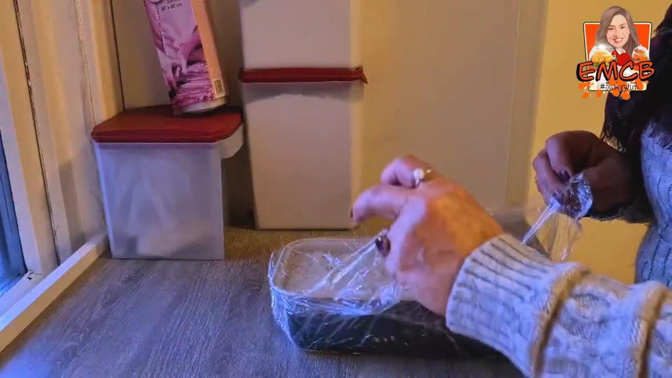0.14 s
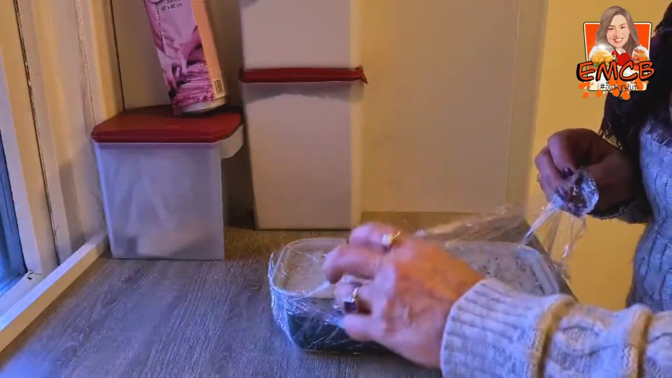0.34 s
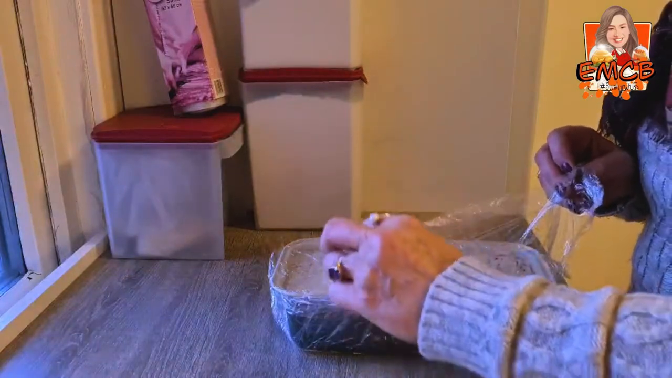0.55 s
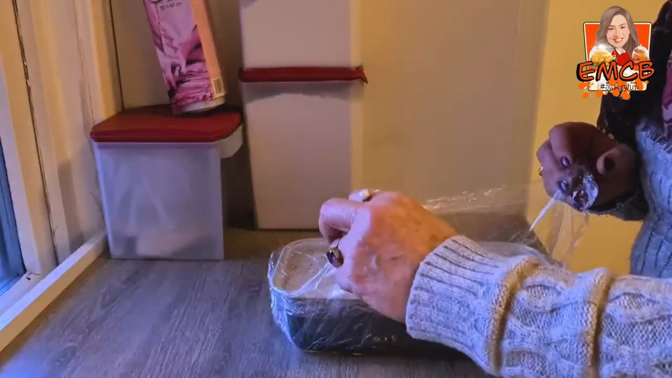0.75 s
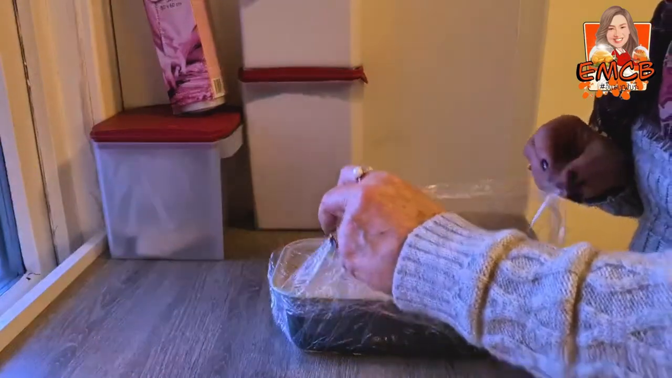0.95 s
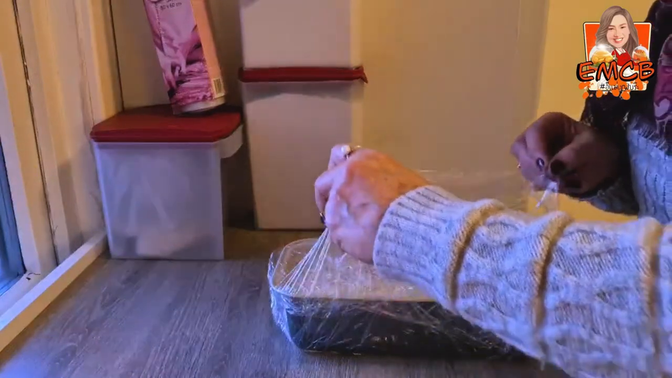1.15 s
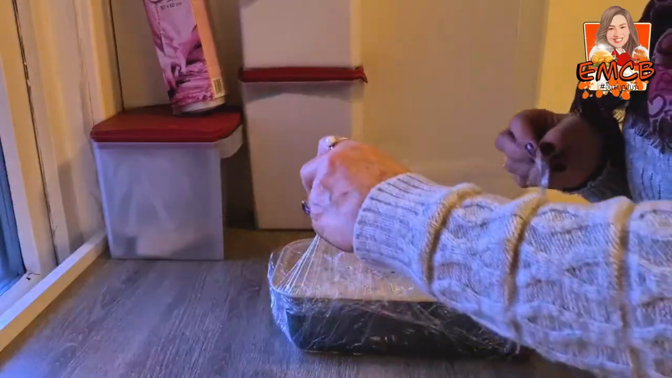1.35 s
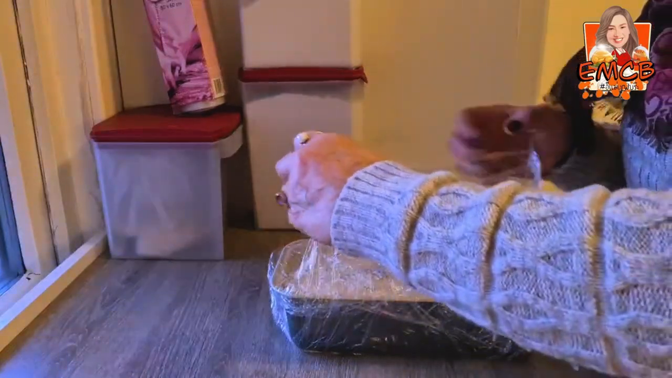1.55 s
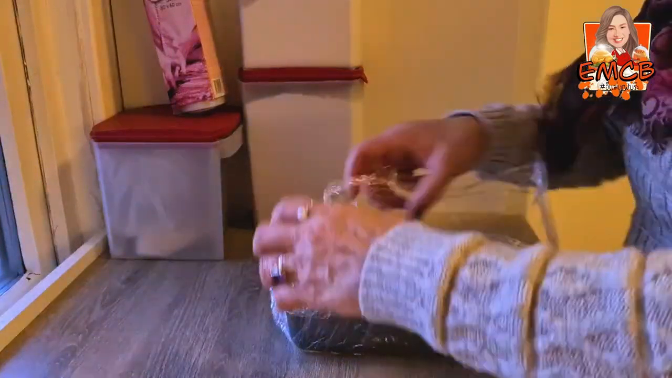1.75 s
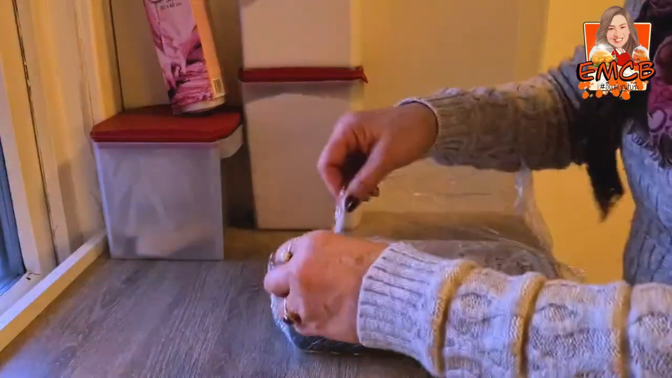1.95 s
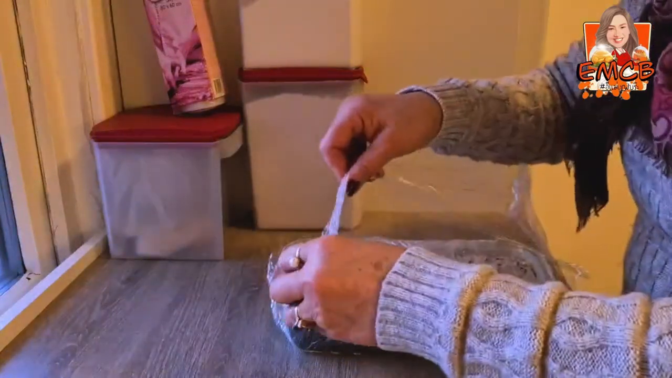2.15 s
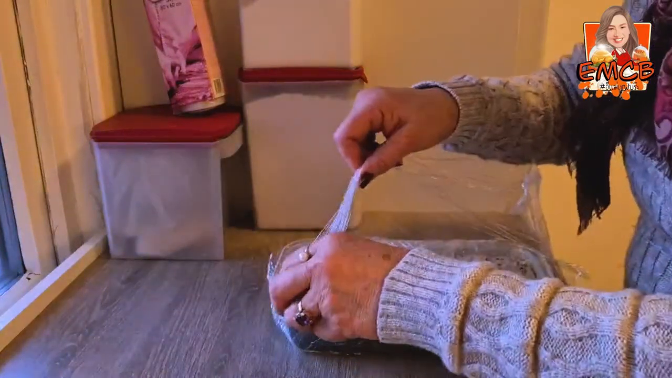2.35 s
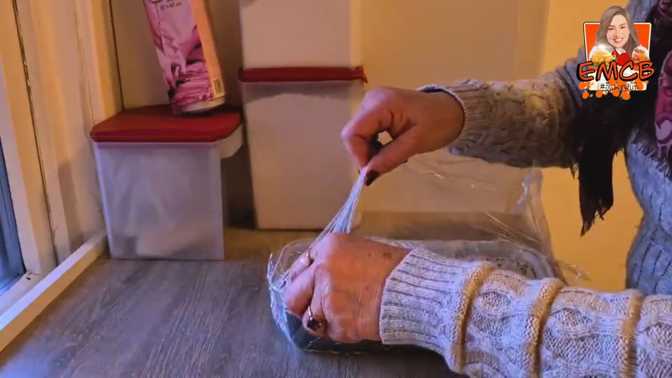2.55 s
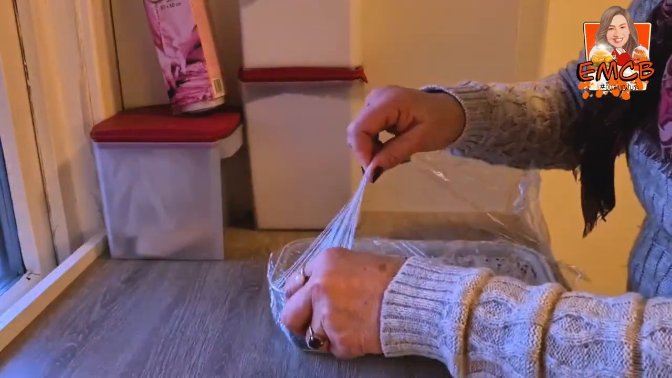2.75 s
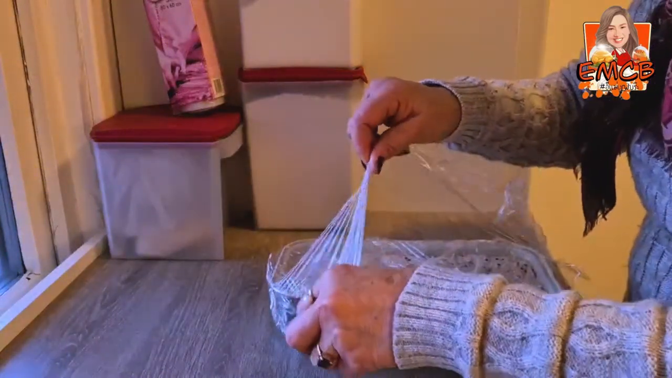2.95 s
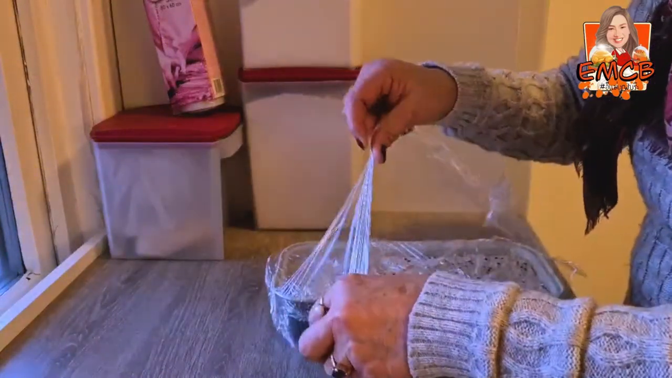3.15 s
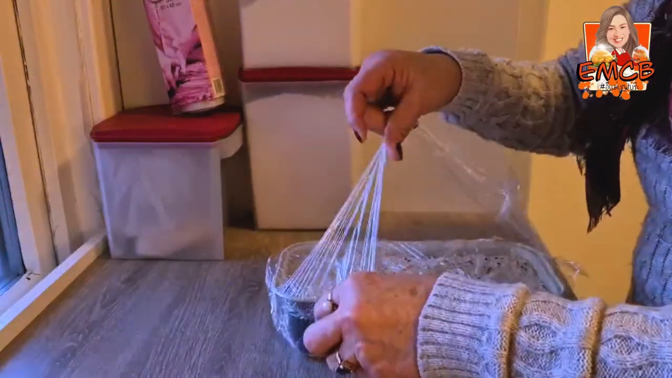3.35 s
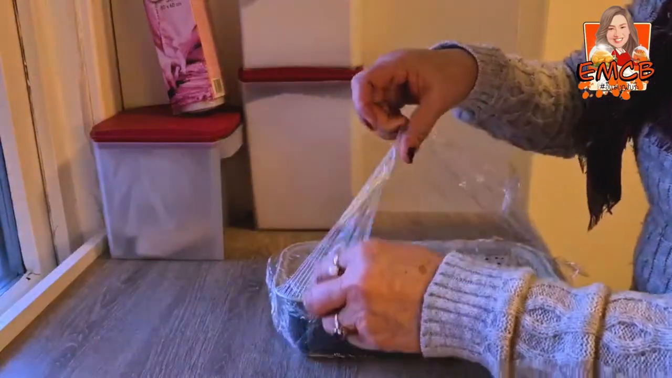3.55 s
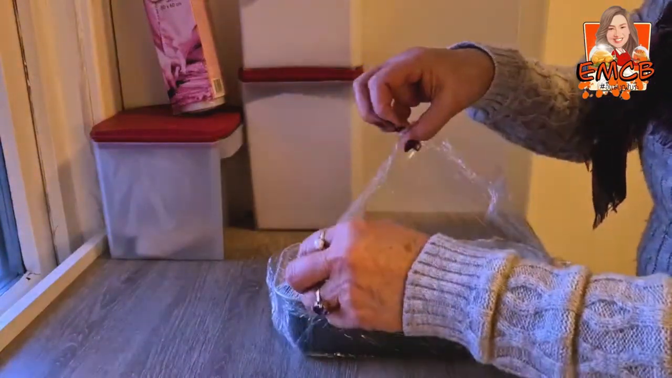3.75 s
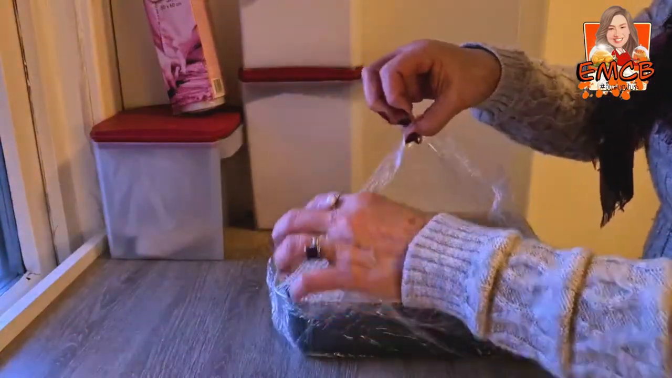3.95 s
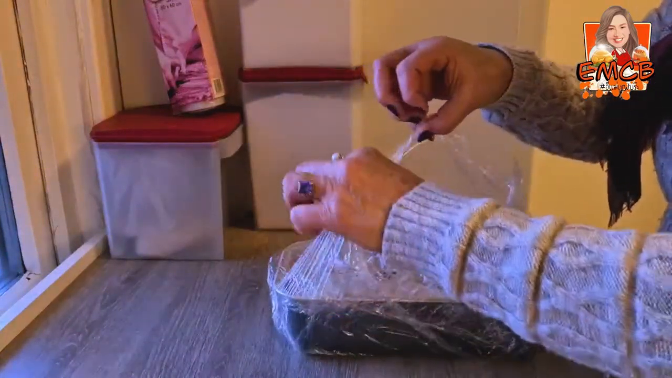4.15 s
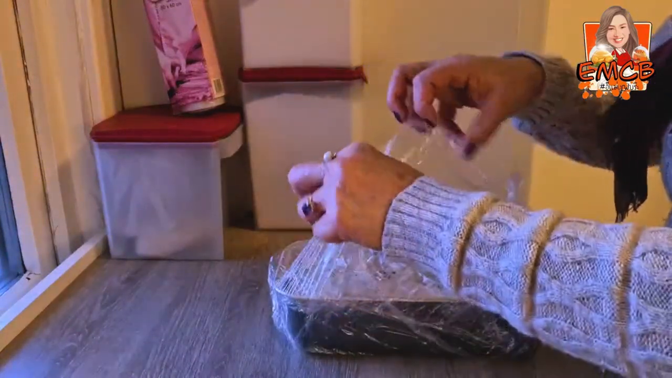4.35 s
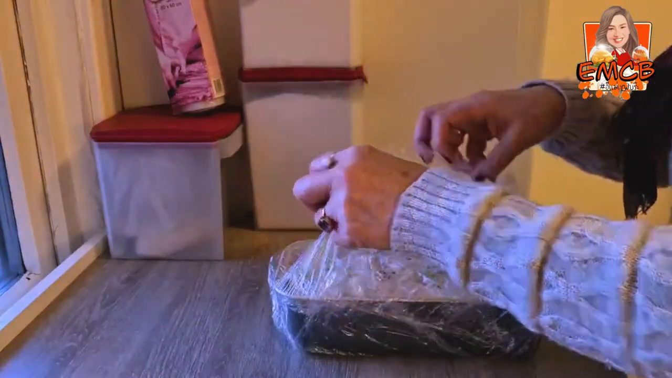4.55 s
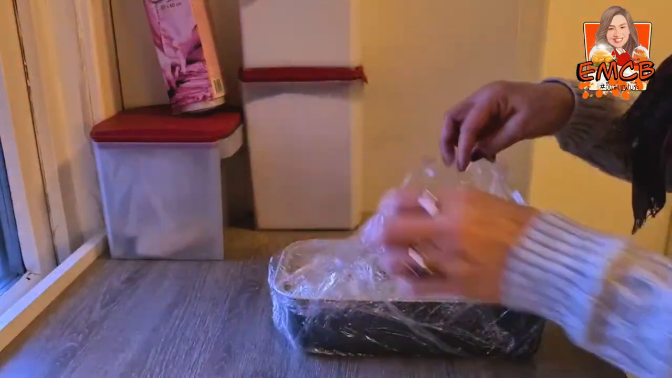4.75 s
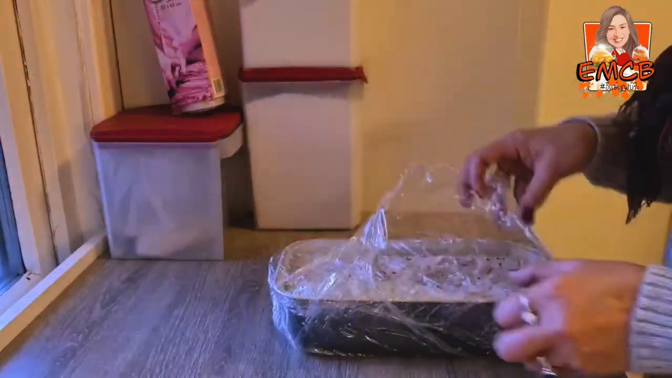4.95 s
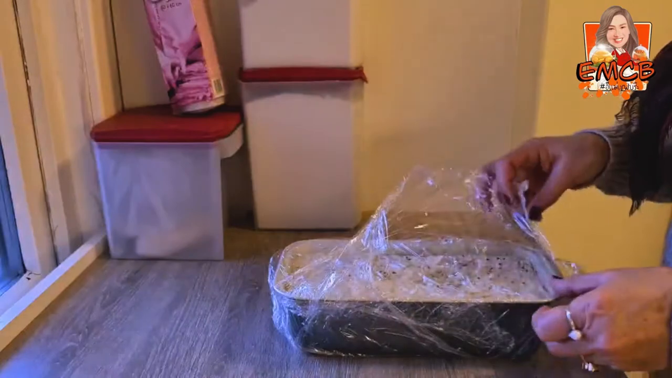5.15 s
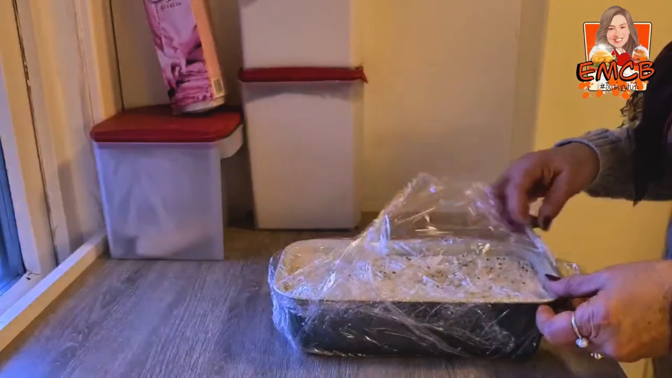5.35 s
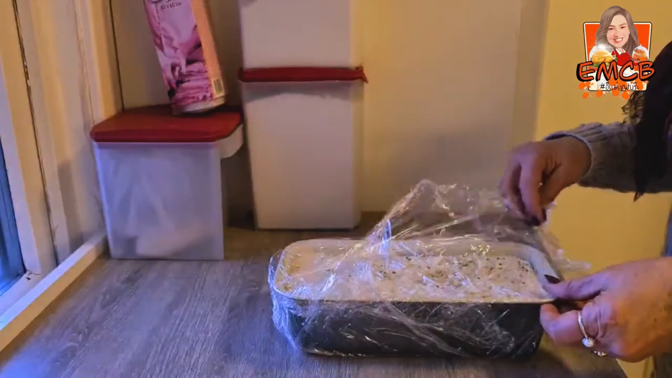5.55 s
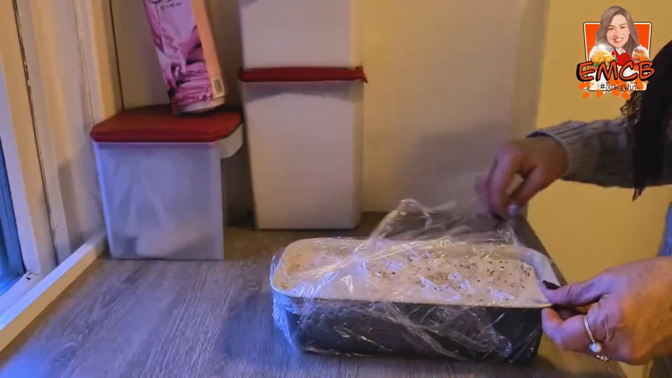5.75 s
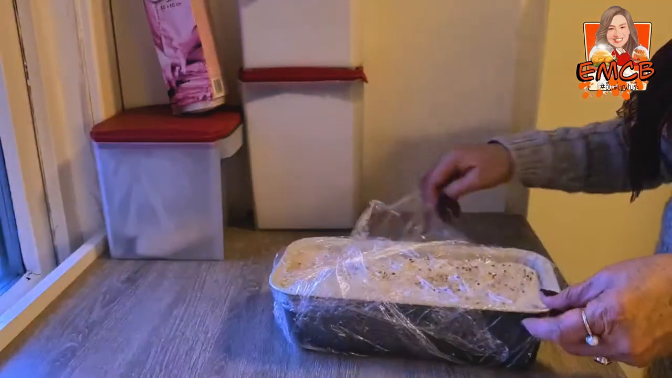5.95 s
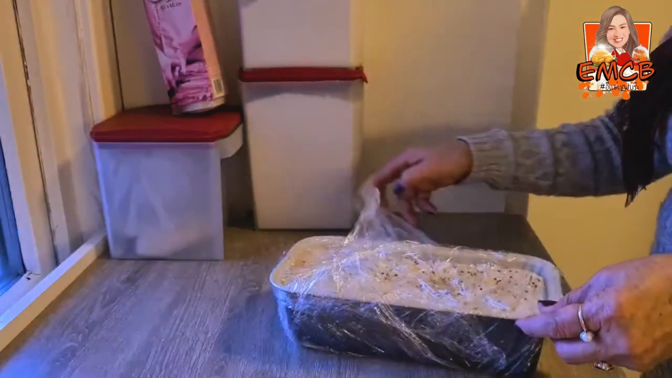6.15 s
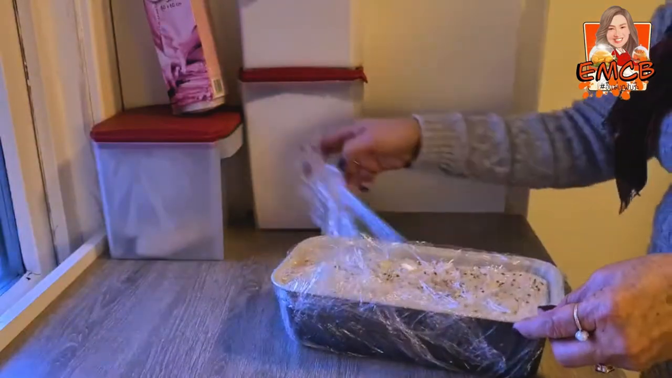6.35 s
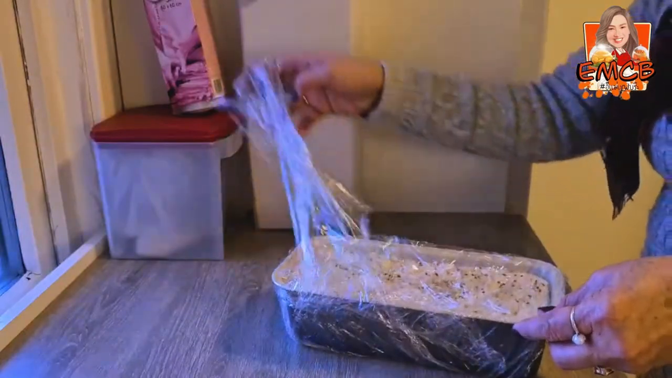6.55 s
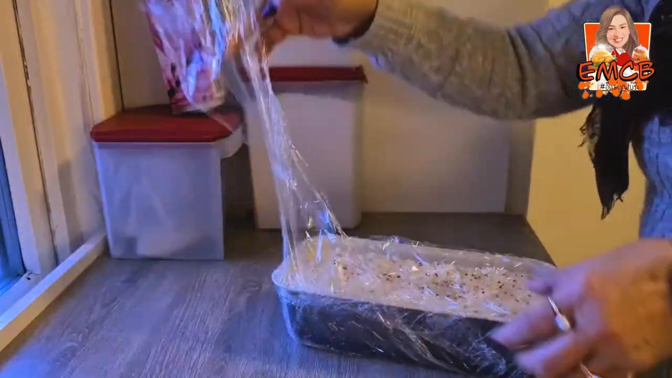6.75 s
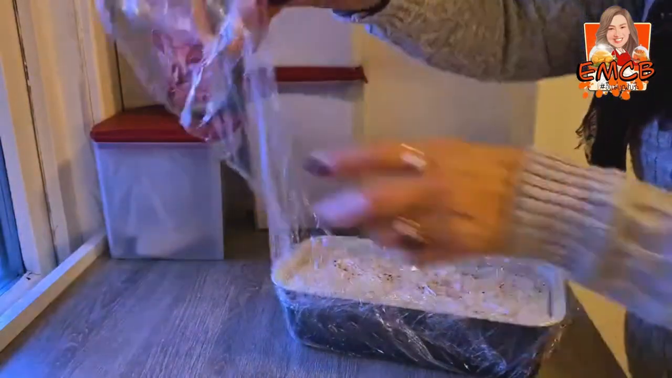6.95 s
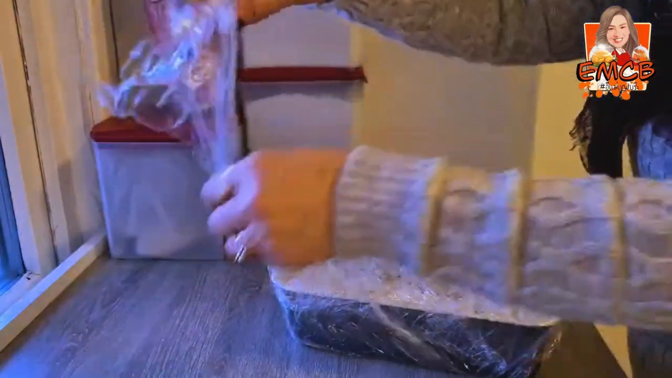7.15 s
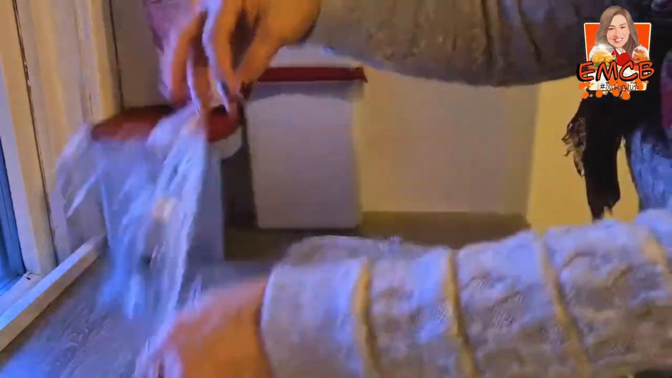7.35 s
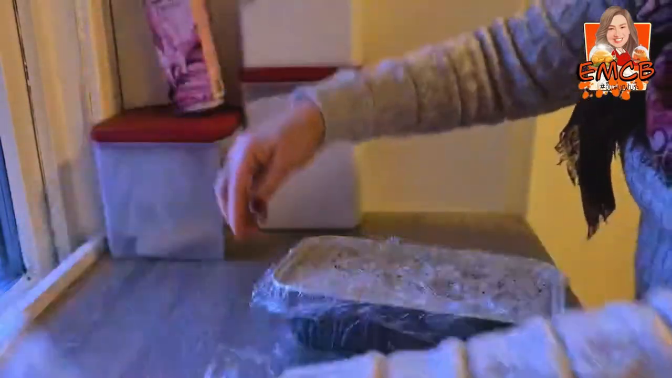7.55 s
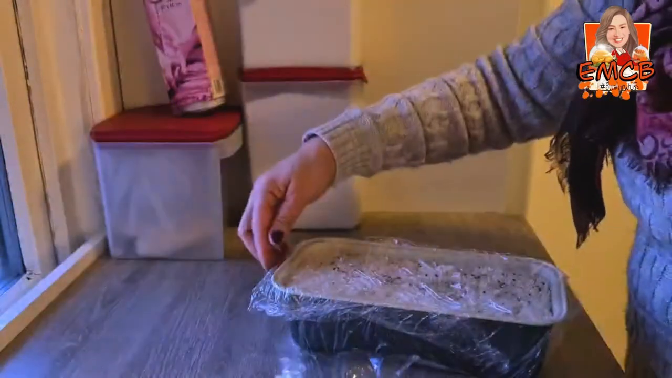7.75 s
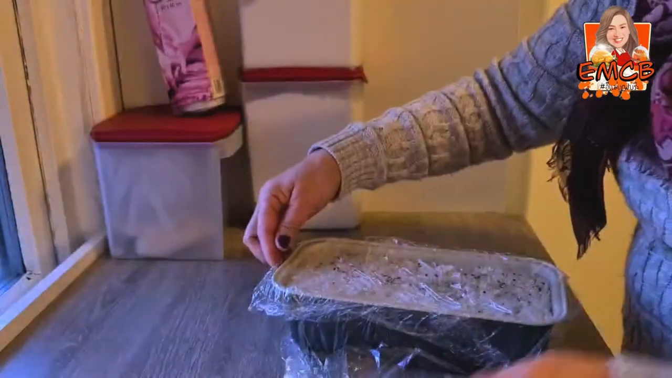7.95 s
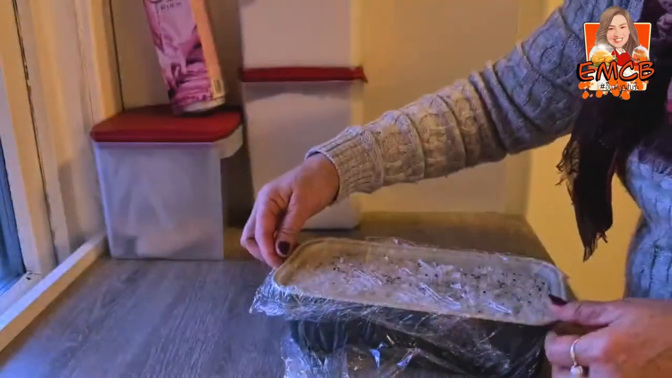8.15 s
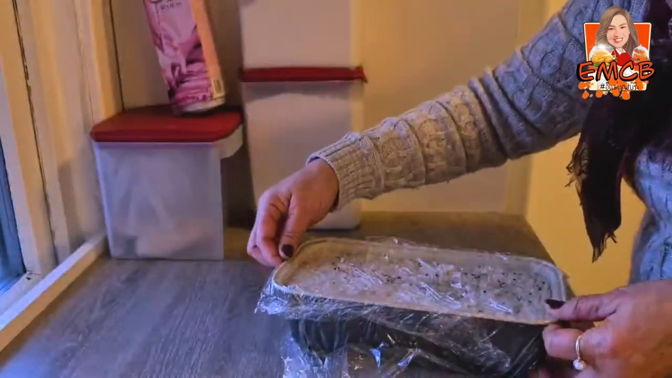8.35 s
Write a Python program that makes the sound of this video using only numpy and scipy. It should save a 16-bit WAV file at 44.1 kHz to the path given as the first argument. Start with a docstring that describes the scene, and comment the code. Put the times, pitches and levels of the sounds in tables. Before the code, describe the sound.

A close stereo pair hears thin plastic film being peeled from a pan in a small, hard, quickly damped kitchen. A burst of bright crinkling opens at 0 s, followed by light crackles and small snaps to 1.5 s, with soft low knocks near 0.5, 0.9 and 1.3. After a short lull, tugs and crisp pops thicken from 1.8 to 3.1, with a firmer pan knock at 3.05. A tiny faint squeak comes near 3.3. Sparse crackle leads to a sharp snap and knock at 4.15, a brief rustle at 4.6, then near quiet around 5. From 5.8 the crinkling grows fuller and louder, peaking around 6.6 to 7.6 with knocks near 6.8 and duller, heavier snaps. It thins to faint fingering after 7.8, with a small knock at 8.4. A weak, steady low hum and soft room air continue throughout.

```python
"""A burst of crinkling is heard first, over a low hum: thin plastic film is peeled off a baking pan on a worktop.
Creases buckle as short damped tones in clumps; stuck patches let go as bursts of coloured noise with a brief ring.
Random slips ring a taut strip in one squeak, and knocks ring decaying modes of the pan and worktop.
An appliance hums at twice the mains rate as two sines, over filtered room noise; sparse echoes form a small hard
room, heard by a close pair of microphones."""
import sys
import numpy as np
from scipy import signal
from scipy.fft import rfft, irfft, next_fast_len
from scipy.io import wavfile
from scipy.ndimage import uniform_filter1d

SR = 44100
rng = np.random.default_rng(int(sys.argv[2]) if len(sys.argv) > 2 else 0)


def wav_record(signal):
    """Record a signal, one row per channel, as 16-bit PCM in the file named by sys.argv[1]."""
    frames = np.transpose(np.atleast_2d(signal))
    bounded = np.clip(frames, -1, 1)
    # unit amplitude maps onto the largest positive 16-bit level
    quanta = np.round(bounded * 32767).astype(np.int16)
    wavfile.write(sys.argv[1], SR, quanta)


N = 374850  # samples

# All source levels are relative, before the final mix.
# Spectrum of the room air: frequency_hz, gain_db
AIR_SPECTRUM = [(30, 1), (80, 11.5), (200, -3.5), (320, -5.5), (600, 1.5), (800, -25), (1500, -7),
                (5000, -27)]
# Course of the appliance hum: time_s, level_db
HUM_LEVEL = [(0.0, -50), (6.77, -48), (8.5, -50)]
# Reverberation time of the room by band: frequency_hz, t60_s
ROOM_DECAY = [(150, 0.18), (600, 0.17), (2500, 0.1), (7000, 0.22), (14000, 0.054)]
# Modes of pan and worktop: frequency_hz, level_db, t60_s
PAN_MODES = [(160, -11, 0.097), (213, -6.5, 0.057), (310, -6, 0.071), (417, -1, 0.042), (535, -2, 0.061),
             (626, -1.5, 0.054), (1004, -4.5, 0.082), (1570, 5, 0.06)]
# Pan rocking on the worktop: start_s, level_db, favoured_pitch_hz
KNOCKS = [(0.509, -32.5, 654), (0.943, -31.5, 166), (1.308, -34, 415), (2.545, -40, 610), (3.026, -31, 651),
          (3.056, -22.5, 210), (4.023, -37, 417), (4.15, -24.5, 230), (4.961, -44, 423),
          (5.093, -46.5, 592), (5.423, -34, 617), (5.614, -36, 460), (6.797, -28, 285), (6.827, -21, 305),
          (6.989, -32.5, 184), (8.308, -42, 536), (8.379, -34, 160)]
# Taut film slipping under a finger: start_s, length_s, level_db, pitch_hz, bandwidth_hz
SQUEAK = (3.268, .1, -45, 1600, 300)
# Stuck patches letting go: start_s, level_db, ring_hz, following_crackle_db
SNAPS = [(0.2385, -35.5, 1660, -39.5), (0.352, -46, 3450, -37.5), (0.4603, -32, 7200, -56),
         (0.5136, -35, 1660, -37), (0.594, -25.5, 7440, -29), (0.858, -33, 3200, -36),
         (0.9435, -29, 2980, -29.5), (1.2496, -38, 3460, -27), (1.309, -33, 865, -47),
         (1.406, -40, 4700, -34), (1.447, -38, 6000, -52), (1.9246, -30, 6000, -38.5),
         (1.9566, -34, 4800, -30.5), (2.071, -29.5, 7740, -36.5), (2.1624, -23, 6040, -37),
         (2.326, -26, 5120, -37), (2.4585, -25, 2950, -32.5), (2.541, -41, 6000, -32.5),
         (2.5495, -18, 2160, -27.5), (2.731, -31.5, 5460, -52), (2.7632, -26.5, 2650, -30.5),
         (2.8159, -24, 2720, -24), (2.8962, -25.5, 1860, -44), (3.028, -30, 2500, -25.5),
         (3.0615, -25, 2930, -19.5), (3.429, -39, 5200, -52), (3.5405, -35, 7200, -37.5),
         (3.761, -41, 3300, -38.5), (3.8, -38, 1390, -27), (3.8058, -25, 3170, -34),
         (3.8748, -30.5, 12400, -41), (4.15, -15, 6800, -27), (4.307, -31.5, 6140, -40),
         (4.557, -31, 2830, -23), (5.847, -32, 4450, -22.5), (5.887, -24.5, 2440, -23.5),
         (6.226, -24, 2970, -44), (6.6604, -31, 2950, -27), (6.879, -20.5, 1300, -22),
         (6.9156, -21.5, 1480, -24.5), (7.1126, -34.5, 3060, -31), (7.213, -36, 3220, -21),
         (7.332, -22, 1510, -20), (7.4837, -20, 1076, -23), (7.6057, -31, 3100, -26.5)]
# Light fingering between tugs: time_s, crinkle_level_db, slack_fold_level_db
FINGERING = [(0, -51, -2), (.3, -51, -7.5), (.5, -42.5, 1.5), (.8, -48, -7), (1.15, -40, -2.5),
             (1.61, -51.5, -8), (1.74, -64, 0.5), (1.9, -40.5, -0.5), (2.3, -42.5, -4), (2.7, -45.5, -6),
             (3.45, -44.5, -6.5), (3.95, -50.5, -4), (4.45, -46, -2.5), (4.8, -54.5, -7.5),
             (5.15, -59.5, -3.5), (5.45, -46, -5), (6.0, -33, -6.5), (6.55, -36, -5.5), (7.07, -44.5, -4.5),
             (7.7, -29.5, -10.5), (7.97, -54.5, -8), (8.5, -48.5, -11)]
# Tugs of the hand: full_strength_from_s, held_s, crinkle_level_db, busiest_patch_hz
TUGS = [(0, 0.025, -26.5, 3170), (0.705, 0.056, -36, 2660), (0.903, 0.0079, -29.5, 1490),
        (.99, 0.053, -36, 2900), (1.18, 0.0099, -38, 2500), (1.32, 0.0073, -34.5, 2880),
        (1.47, 0.045, -45.5, 4440), (1.56, 0.029, -60, 5000), (1.818, 0.047, -36.5, 1530),
        (1.96, 0.018, -44, 3980), (2.14, 0.053, -36.5, 2500), (2.42, 0.006, -41, 2900),
        (2.831, 0.038, -33, 2500), (2.95, 0.008, -39, 2500), (3.044, 0.066, -32.5, 2500),
        (3.82, 0.093, -44, 2860), (4.058, 0.099, -38.5, 3000), (4.16, 0.096, -40, 2120),
        (4.566, 0.12, -39.5, 2750), (5.339, 0.019, -38.5, 2440), (5.492, 0.067, -37.5, 600),
        (5.62, 0.085, -39.5, 4960), (5.79, 0.086, -29.5, 2540), (6.03, 0.044, -29, 2840),
        (6.229, 0.02, -28, 2920), (6.309, 0.043, -28, 2500), (6.63, 0.19, -27.5, 2840),
        (6.794, 0.056, -24, 2660), (6.93, 0.076, -29, 2920), (7.125, 0.12, -38, 2920),
        (7.309, .11, -28.5, 1610), (7.5, 0.049, -28, 2500)]
# Spectrum of tight folds: frequency_hz, gain_db
CRISP_SPECTRUM = [(600, -25.5), (1500, -8), (2400, -8.5), (3100, -3.5), (5000, -2), (9400, -3), (12000, 1),
                  (14300, 2.5)]
# Spectrum of slack folds: frequency_hz, gain_db
DULL_SPECTRUM = [(60, -18), (150, -2), (400, -5), (650, 1.5), (1300, 0), (2200, -3), (4000, 9.5)]

AIR_DB, HUM_HZ = -57, 99.9
MIC_LAG_S = .0002  # standard deviation of the arrival lag between microphones
EDGE_HZ = 14400  # upper band limit
REST_HZ = 2500  # busiest patch between tugs
# A tug gains RISE_DB over its held time plus RISE_S, so long pulls build slowly.
RISE_DB, RISE_S, FALL_DB_PER_S = 38.5, 0.081, 289
STILL_DB = -47  # well below this level hardly any patch of film leads


def gain_of(db):
    """Decibel law: amplitude is ten to the power of level over twenty."""
    return 10 ** (np.asarray(db) / 20)


def unit_rms(x):
    """Energy normalisation: the mean square becomes one."""
    return x / np.sqrt(np.mean(x ** 2) + 1e-20)


def at_frequency(points, hz):
    """Logarithmic frequency scale: table values are joined linearly along it."""
    table_hz, value = np.transpose(points)
    return np.interp(np.log(hz + 1), np.log(table_hz + 1), value)


def over_time(rows):
    """Linear interpolation: each column after the time becomes a signal."""
    time_s, *columns = np.transpose(rows)
    return [np.interp(np.arange(N) / SR, time_s, column) for column in columns]


def coloured(x, spectrum):
    """Linear filtering: each frequency is scaled by a gain in dB."""
    size = next_fast_len(N)
    gain = gain_of(at_frequency(spectrum, np.fft.rfftfreq(size, 1 / SR)))
    return irfft(rfft(x, size) * gain, size)[..., :N]


def add(mix, start_s, sound):
    """Superposition: a sound is summed into the mix, in place."""
    part = mix[..., round(start_s * SR):][..., :sound.shape[-1]]
    part += sound[..., :part.shape[-1]]


def drift(per_s):
    """Low-passed chance: a unit-RMS signal that changes about per_s times a second."""
    span = max(round(SR / per_s), 2)
    smooth = uniform_filter1d(rng.standard_normal(N), span)
    return unit_rms(uniform_filter1d(smooth, span))


def air():
    """Spatial coherence of diffuse noise: the two microphones share about half of the air noise, much alike
    across the band."""
    shared, left, right = rng.standard_normal((3, N))
    alike = coloured(shared, [(300, -8.0), (1500, -2.5)])
    apart = coloured(np.array([left, right]), [(100, -9.0), (1500, -2.5)])
    level_db = AIR_DB + 0.83 * drift(21.0)
    return gain_of(level_db) * unit_rms(coloured(alike + apart, AIR_SPECTRUM))


def hum():
    """Harmonic vibration: a nearly pure buzz with a weak octave overtone wavers a little in level."""
    phase = 2 * np.pi * HUM_HZ * np.arange(N) / SR
    tone = np.sin(phase) + gain_of(-22.5) * np.sin(2 * phase)
    level_db = over_time(HUM_LEVEL)[0] + 0.38 * drift(5.0)
    return np.sqrt(2) * gain_of(level_db + [[.6], [-.6]]) * tone  # left, right offsets in dB


def room(x):
    """Reverberation: sparse echoes of random sign die at a rate set by band; long waves reach both ears of the pair alike."""
    echoes = np.zeros((2, SR // 2))
    at = np.arange(60, SR // 2 - 20, 20)  # one echo in each slot of 20 samples
    at = at + rng.integers(0, 20, (2, len(at)))
    np.put_along_axis(echoes, at, rng.choice([-1., 1.], at.shape), 1)
    hz, t, bands = signal.stft(echoes, SR, nperseg=256)
    same = 1 / np.sqrt(1 + (hz[:, None] / 500) ** 2)
    bands[1] = same * bands[0] + np.sqrt(1 - same ** 2) * bands[1]
    decay = gain_of(-60 * t / at_frequency(ROOM_DECAY, hz)[:, None])
    tail = signal.istft(bands * decay, SR, nperseg=256)[1]
    return signal.fftconvolve(x, tail / np.linalg.norm(tail[0]), axes=1)[:, :N]


def knocks():
    """Modal excitation: soft blows ring the low modes, most of all those near the favoured pitch."""
    out, t = np.zeros(N), np.arange(SR // 4) / SR
    chance = rng.standard_normal((len(KNOCKS), len(PAN_MODES)))
    for (start_s, level_db, favoured_hz), jitter in zip(KNOCKS, chance):
        ring = np.zeros(len(t))
        for (hz, mode_db, t60_s), j in zip(PAN_MODES, jitter):
            octaves = abs(np.log2(hz / favoured_hz))
            envelope = gain_of(mode_db - 8.2 * octaves + 2.0 * j - 60 * t / t60_s)
            ring += envelope * np.sin(2 * np.pi * hz * (1 + 0.026 * j) * t)
        ring *= 1 - np.exp(-t / 0.0044)  # soft onset
        add(out, start_s, gain_of(level_db) * ring / abs(ring).max())
    return out


def squeak():
    """Stick-slip: uneven slips ring one taut strip of film."""
    start_s, length_s, level_db, hz, width_hz = SQUEAK
    t, out = np.arange(0, length_s, 1 / SR), np.zeros(N)
    slips = rng.standard_normal(len(t)) * (rng.random(len(t)) < 600 / SR)  # about 600 a second
    resonance = np.sin(2 * np.pi * hz * t) * np.exp(-np.pi * width_hz * t)
    strip = signal.oaconvolve(slips, resonance)[:len(t)]
    envelope = np.minimum(t / 0.0063, 1) * np.sqrt(1 - t / length_s)
    add(out, start_s, gain_of(level_db) * unit_rms(strip) * envelope)
    return out


def snaps():
    """Sudden release: a tear of a millisecond or two, coloured around the film's pitch, with a brief ring."""
    out, t = np.zeros((2, N)), np.arange(700) / SR
    chance, bins_hz = rng.standard_normal((len(SNAPS), 3, 700)), np.fft.rfftfreq(700, 1 / SR)
    for (start_s, level_db, hz, _), (both, left, right) in zip(SNAPS, chance):
        octaves = abs(np.log2((bins_hz + 1) / hz))
        colour = gain_of(-4.0 * np.minimum(octaves, 4))
        noise = both + 0.46 * np.array([left, right])
        tear = unit_rms(irfft(rfft(noise) * colour, 700)) * np.exp(-t / 0.001)
        ring = 0.38 * np.sin(2 * np.pi * hz * t) * np.exp(-t / 0.0033)
        snap = (1 - np.exp(-t / 0.00015)) * (tear + ring)
        add(out, start_s, gain_of(level_db + 8.5) * snap / abs(snap.mean(0)).max())
    return out


def hand():
    """Addition of powers: fingering, tugs and crackle after snaps sum; the strongest sets the pitch and leads more when loud."""
    t = np.arange(N) / SR
    power = gain_of(2 * over_time(FINGERING)[0])
    weighted_pitch = power * np.log(REST_HZ)
    for start_s, held_s, level_db, hz in TUGS:
        rise_db = RISE_DB / (held_s + RISE_S) * np.maximum(start_s - t, 0)
        fall_db = FALL_DB_PER_S * np.maximum(t - start_s - held_s, 0)
        tug = gain_of(2 * (level_db - rise_db - fall_db))
        power += tug
        weighted_pitch += tug * np.log(hz)
    t = t[:SR // 2]
    for start_s, _, hz, level_db in SNAPS:
        crackle = gain_of(2 * (level_db - 60 * t / 0.12)) * (1 - np.exp(-t / 0.00037))
        add(power, start_s, crackle)
        add(weighted_pitch, start_s, crackle * np.log(hz))
    lead = power / (power + gain_of(2 * STILL_DB))
    return power, np.exp(weighted_pitch / power), lead


def folds(focus_hz, lead, spectrum, per_s, spread_db, low_hz, high_hz, cycles, busy_db, count=20):
    """Random buckling: creases click and ring; each patch has its pitch and busy spells, each crease its direction."""
    at = np.flatnonzero(rng.random(N) < per_s / SR)
    pop_db = 11 * (rng.random(N) < .004)  # a few creases pop out
    size = gain_of(spread_db * np.minimum(rng.exponential(1, N), 4) + pop_db)
    lag = np.round(MIC_LAG_S * SR * rng.standard_normal(N)[at]).astype(int)
    later = np.clip(at + lag, 0, N - 1)  # arrival at the right microphone
    place = rng.integers(0, count, N)[at]
    t, out = np.arange(512) / SR, np.zeros((2, N))
    for k, hz in enumerate(np.geomspace(low_hz, high_hz, count)):
        tick = np.sin(2 * np.pi * hz * t) * np.exp(-t * hz / cycles)
        tick[0] = 0.5 * np.linalg.norm(tick)  # the buckling itself is a bare click
        octaves = np.log2(hz / focus_hz)
        near_db = lead * (7.0 * np.exp(-(octaves / 0.45) ** 2) - 1.2 * abs(octaves))
        strength = size * gain_of(busy_db * drift(18.0) + near_db)
        blows = strength[at] * (place == k)
        trains = np.array([np.bincount(at, blows, N), np.bincount(later, blows, N)])
        out += signal.oaconvolve(trains, tick[None] / np.linalg.norm(tick))[:, :N]
    return unit_rms(coloured(out, spectrum))


def crinkle():
    """Amplitude modulation: the hand sets the level of tight and slack folds, which swell in small clumps."""
    power, focus_hz, lead = hand()
    dull_db = over_time(FINGERING)[1]
    clumps_db = 1.74 * drift(74.0)
    crisp = folds(focus_hz, lead, CRISP_SPECTRUM, per_s=5000, spread_db=0.26,
                  low_hz=1188, high_hz=12500, cycles=2.26, busy_db=1.0)
    dull = folds(focus_hz, lead, DULL_SPECTRUM, per_s=1500, spread_db=2.73,
                 low_hz=188.0, high_hz=2554, cycles=3.0, busy_db=3.64)
    return np.sqrt(power) * (crisp * gain_of(clumps_db) + dull * gain_of(dull_db + clumps_db))


def scene():
    """Direct and reverberant fields: near sources sum with their echoes, then hum and air join."""
    near = crinkle() + snaps() + knocks() + squeak()
    balance = gain_of([[-.4], [.4]])  # left, right
    return balance * (gain_of(-1.0) * near + gain_of(-4.5) * room(near)) + hum() + air()


def record(dry):
    """Band limitation: a linear-phase low-pass removes the highest treble."""
    low_pass = signal.firwin(511, EDGE_HZ, window=("kaiser", 9), fs=SR)
    return signal.oaconvolve(dry, low_pass[None], "same")


dry = scene()
out = record(dry)
wav_record(out)
```